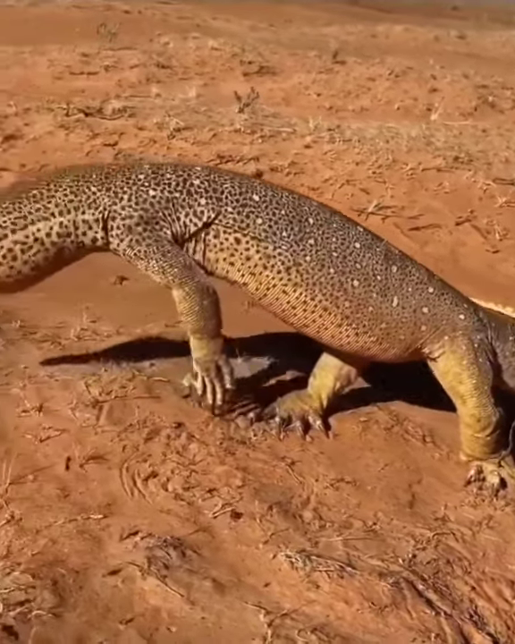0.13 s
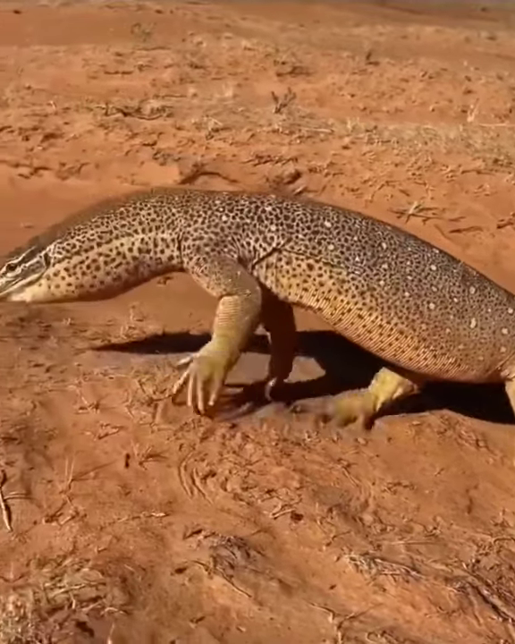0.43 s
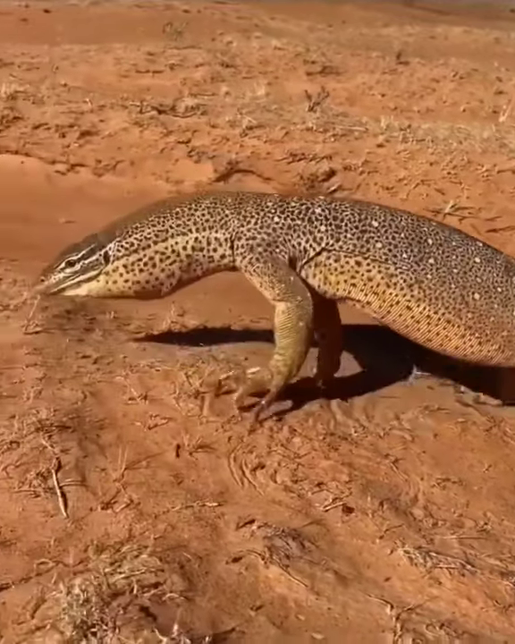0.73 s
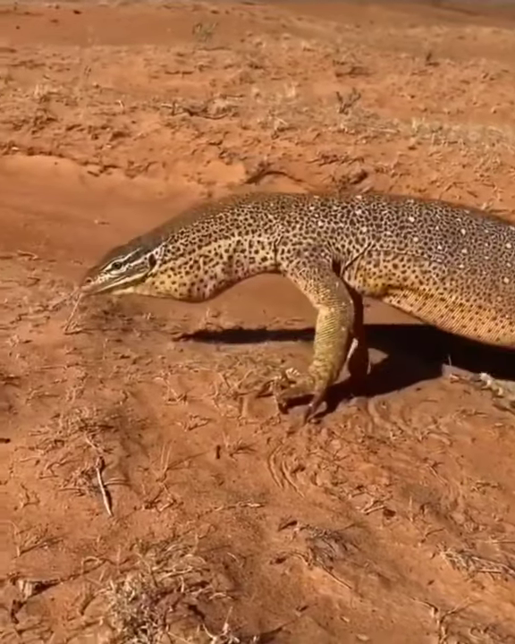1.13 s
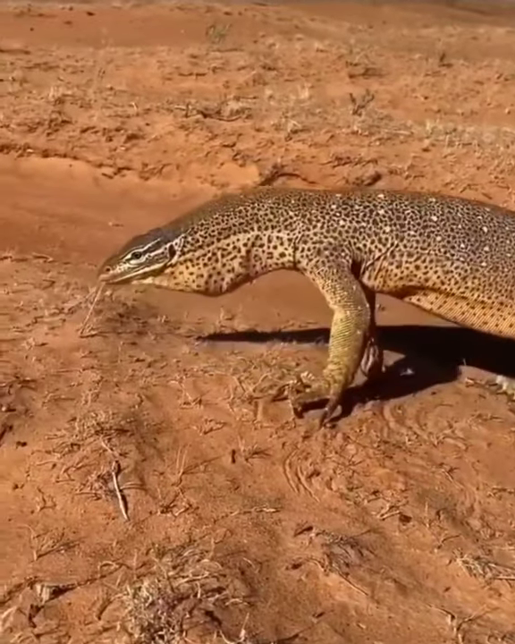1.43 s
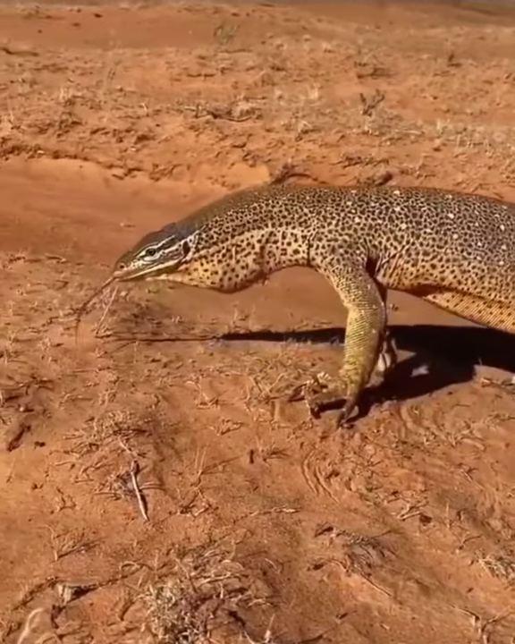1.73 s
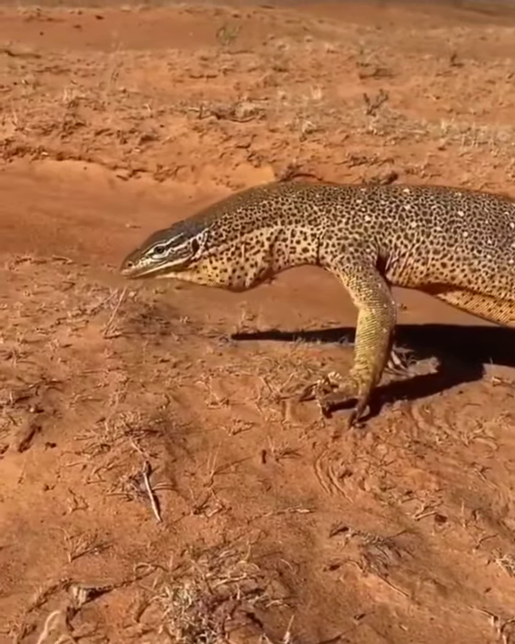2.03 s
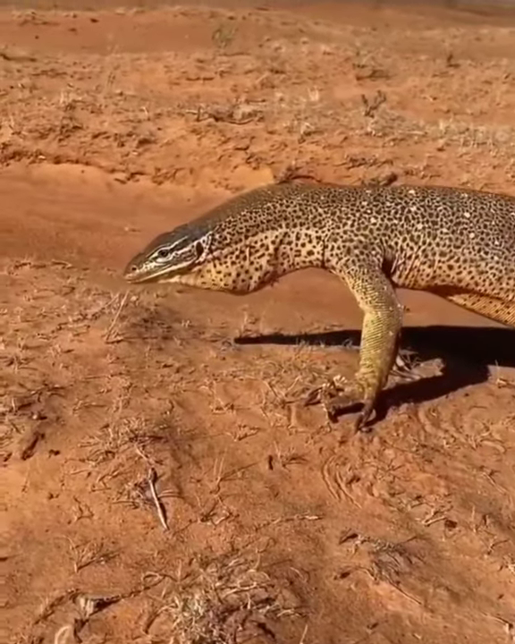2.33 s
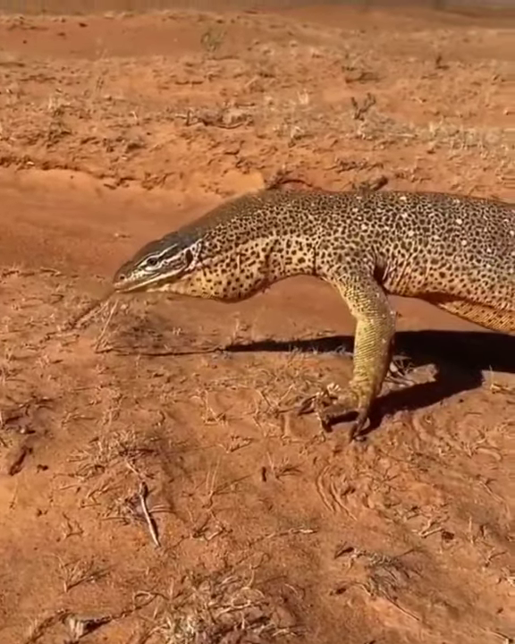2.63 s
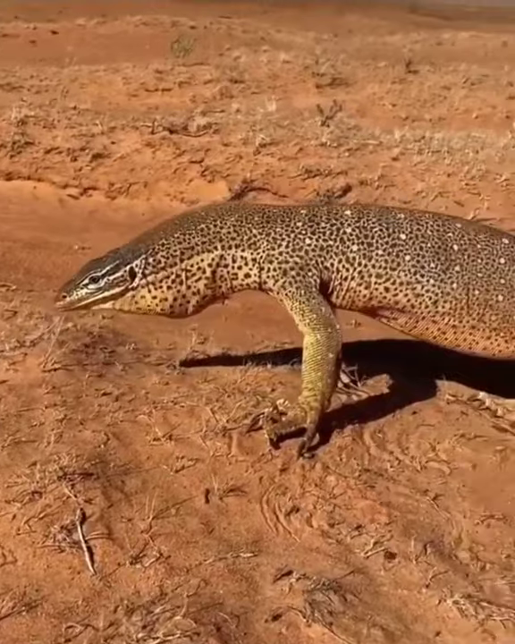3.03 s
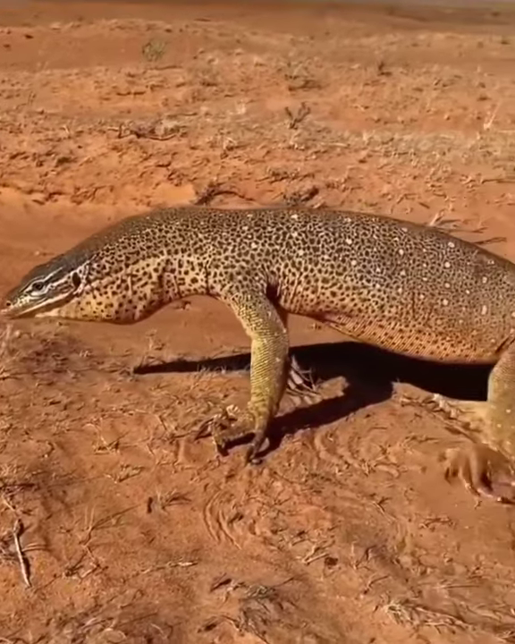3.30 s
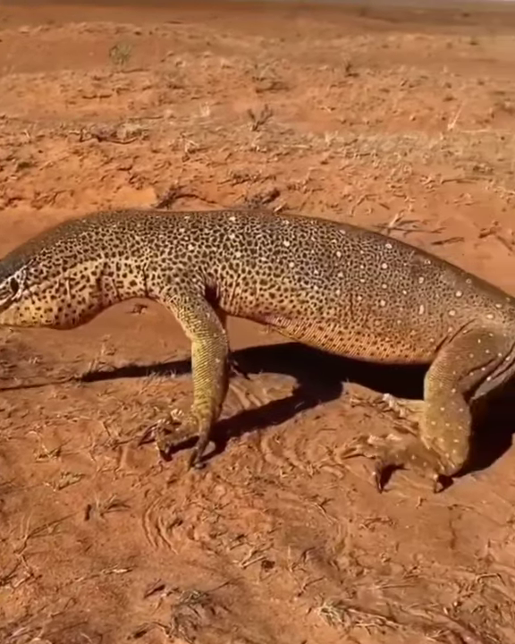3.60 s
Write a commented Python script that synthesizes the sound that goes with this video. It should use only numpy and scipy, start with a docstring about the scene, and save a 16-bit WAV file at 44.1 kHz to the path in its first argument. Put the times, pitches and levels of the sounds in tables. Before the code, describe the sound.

A hissing, hollow wind gust opens loudly, sinks in pitch and dies within a second, leaving low rumble and irregular flapping buffets on the microphone, with faint sand scuffs from a large lizard on open dry ground.

```python
"""A gust rushes past with a hiss and a hollow howl that sinks as it dies away; low rumble and flapping buffets remain.
Under them a faint sandy rustle as a large lizard walks by on dry open ground.
The howl is narrow noise that follows a pitch; roar, hiss, rumble and air are coloured noise under level curves.
Buffets are bursts of low noise, slaps short pressure waves, scuffs hiss with dense grains, ticks decaying noise."""
import sys
import numpy as np
from scipy import signal
from scipy.fft import rfft, irfft
from scipy.io import wavfile
from scipy.ndimage import uniform_filter1d

SR = 44100
rng = np.random.default_rng(int(sys.argv[2]) if len(sys.argv) > 2 else 0)


def store_wav(level_fs):
    """Save 16-bit WAV to argv[1]."""
    pcm = np.round(np.clip(np.atleast_2d(level_fs), -1, 1) * 32767)
    wavfile.write(sys.argv[1], SR, pcm.T.astype(np.int16))


N = 165816
TIME_S = np.arange(N) / SR
FREQ_HZ = np.maximum(np.fft.rfftfreq(N, 1 / SR), 1)

# Noise colours of the background. Each row: frequency in Hz, relative gain in dB.
AIR_COLOUR = [(200, 33), (700, 6.5), (2500, -4), (6000, -6), (13000, -80)]
SWISH_COLOUR = [(250, -45), (500, -2), (950, 2), (2800, -11.5), (4500, -22.5)]
SIZZLE_COLOUR = [(4000, -23.5), (7400, -5.5), (10000, -19)]
RUMBLE_COLOUR = [(28, -27), (48, -1.5), (72, 4), (140, -9.5), (220, -19.5), (500, -48), (900, -72),
                 (2500, -98)]
# Noise colours of sand and snapping grit. Each row: frequency in Hz, relative gain in dB.
RUSTLE_COLOUR = [(600, -6.5), (2100, 1.5), (3700, 0.5), (5000, -5), (6200, -5), (7500, -15), (11000, -11.5)]
TICK_COLOUR = [(1500, -15), (3500, 1), (6500, -5), (12000, -1.5)]
# Noise colours of the buffets and the gust. Each row: frequency in Hz, relative gain in dB.
THUD_COLOUR = [(50, -3), (110, 1), (200, 2), (310, -6), (420, -14), (700, -62.5)]
FLAP_COLOUR = [(200, 7), (420, 3), (590, 4.5), (760, -20), (1000, -37), (2500, -65)]
ROAR_COLOUR = [(150, -20), (250, -3.5), (330, 2.5), (450, 3), (650, -1.5), (950, -7.5), (1200, -15),
               (1550, -15), (1900, -33), (4500, -53)]
HISS_COLOUR = [(1200, -21.5), (1900, 2.5), (2500, 0), (2950, -1.5), (3250, -4.5), (3560, 1), (3900, -4.5),
               (4250, 3), (4700, -2), (5300, -2), (6400, -2.5), (7400, -1), (8400, -6), (9500, 0.5),
               (10800, -5), (11600, -7.5), (12600, -9.5)]
# Stereo width of ground sounds, microphone ports and gust. Each row: frequency in Hz, side gain in dB.
GROUND_WIDTH = [(800, 5.5), (1900, -7), (3900, -4), (7500, 7.5)]
PORT_WIDTH = [(30, -8), (70, -34.5), (130, -22), (400, -4), (900, 10)]
GUST_WIDTH = [(600, -8), (1800, -28), (2600, 2), (3500, -19.5), (5200, 0), (8000, 2)]

# Soft swish of air. Each row: time in seconds, level in dB.
SWISH_LEVEL = [(0.65, -56), (0.9, -67), (1.08, -55.5), (1.24, -62), (1.31, -72.5), (1.345, -86),
               (1.38, -78), (1.44, -62), (1.59, -88.5)]
# Faint high sizzle. Each row: time in seconds, level in dB.
SIZZLE_LEVEL = [(1.55, -100), (1.8, -85), (2.25, -74), (2.42, -100)]
# Wind pressure on the microphone. Each row: time in seconds, relative level in dB.
PRESSURE = [(0, -45), (0.06, -45), (0.1, -37), (0.22, -50), (0.28, -39), (0.45, -48.5), (0.73, -49.5),
            (0.8, -47.5), (1.3, -46), (1.8, -46.5), (1.97, -52.5), (2.15, -46), (2.19, -62), (2.3, -48),
            (2.41, -55.5), (2.46, -38), (2.5, -54.5), (2.57, -32), (2.64, -49.5), (2.69, -40), (3.24, -55),
            (3.4, -45), (3.48, -56.5), (3.65, -46)]
# Scuffs of dry sand and grass. Each row: start in seconds, hold in seconds, relative level in dB.
SCUFFS = [(0.74, 0.45, -60.5), (1.234, 0.061, -66.5), (1.358, 0.068, -67.5), (1.432, 0.1, -64.5),
          (1.658, 0.11, -68.5), (1.777, 0.63, -75.5), (2.246, 0.087, -65.5), (2.322, 0.074, -70.5),
          (2.406, 0.32, -76.5), (2.661, 0.1, -70), (2.785, 0.063, -64.5), (2.865, 0.062, -66.5),
          (2.906, 0.039, -61.5), (3.026, 0.14, -65), (3.209, 0.14, -63.5), (3.367, 0.043, -60.5),
          (3.42, 0.092, -67), (3.497, 0.035, -62.5), (3.67, 0.069, -80)]
# Snaps of grit underfoot. Each row: start in seconds, initial level in dB.
TICKS = [(2.591, -64.5), (2.692, -62), (2.969, -61), (3.001, -60), (3.018, -69), (3.068, -57)]
# Eddies that hit the microphone. Each row: start in seconds, relative level in dB, hold in seconds.
BUFFETS = [(0.092, -32.5, 0.009), (0.248, -22.5, 0.0074), (0.325, -26.5, 0.018), (0.649, -30.5, 0.021),
           (0.762, -34.5, 0.025), (0.813, -27, 0.013), (0.868, -27.5, 0.013), (0.998, -30, 0.0098),
           (1.023, -26, 0.025), (1.143, -28, 0.0049), (1.181, -34.5, 0.0065), (1.309, -27.5, 0.027),
           (1.343, -28.5, 0.013), (1.403, -32.5, 0.0082), (1.434, -24, 0.0052), (1.5, -47, 0.009),
           (1.585, -37, 0.053), (1.651, -33, 0.017), (1.69, -34, 0.037), (1.757, -35, 0.038),
           (1.795, -32, 0.0056), (1.881, -30.5, 0.011), (2.145, -36, 0.0098), (2.22, -35, 0.0095),
           (2.283, -27.5, 0.0029), (2.335, -35.5, 0.04), (2.539, -25, 0.014), (2.591, -37, 0.043),
           (2.678, -23, 0.006), (2.741, -24, 0.012), (2.877, -33, 0.014), (3.083, -28.5, 0.0083),
           (3.146, -39.5, 0.051), (3.332, -34.5, 0.008), (3.405, -36, 0.0046), (3.575, -33, 0.0091),
           (3.629, -36, 0.031)]
# Slaps of the sharpest eddies. Each row: centre in seconds, level in dB, pitch in Hz.
SLAPS = [(1.032, -38.5, 450), (1.159, -45, 308), (1.321, -35.5, 368), (1.343, -41.5, 567),
         (1.446, -39.5, 390), (2.298, -37.5, 315), (2.551, -34.5, 292), (2.683, -29.5, 382),
         (2.749, -39.5, 370), (3.728, -48, 432)]
# Howl of the gust. Each row: time in seconds, pitch in Hz, relative level in dB.
HOWL = [(0.0, 521.3, -40.5), (0.08, 512, -41), (0.125, 449.2, -50.5), (0.25, 341.5, -41.5), (0.4, 388, -41),
        (0.545, 360.7, -39), (0.6, 324.2, -44), (0.68, 282, -49)]
# Force of the gust. Each row: time in seconds, relative roar level in dB, relative hiss level in dB.
GUST_FORCE = [(0.0, -41.5, -37.5), (0.034, -39.5, -33), (0.218, -46.5, -46), (0.616, -51.5, -48.5),
              (0.684, -64.5, -57.5), (0.852, -54.5, -59.5), (0.9, -60, -86)]
# Thin whistles in the gust. Each row: pitch in Hz, wander rate in Hz, level against the hiss in dB.
WHISTLES = [(2941, 7, -18), (3558, 7, -18)]
# Close reflection of the hiss. Each row: time in seconds, delay in milliseconds.
REFLECTION = [(0, 0.29), (.17, 0.32), (.33, 0.27), (.47, 0.24), (.7, 0.23)]
# Narrow hollow rising through the hiss. Each row: time in seconds, centre in Hz.
HOLLOW = [(0, 5200), (0.2, 5280), (0.33, 5500), (0.45, 6100)]

AIR_DB = -66.5
RUMBLE_DB, RUMBLE_LUMPS_DB, RUMBLE_EVENING = 3.5, 2.3, 0.56
SCUFF_ATTACK_S, SCUFF_RELEASE_DB_PER_S = 0.029, 263
RUSTLE_DB, GRIT_DB, GRAINS_PER_S, GRAIN_SPREAD_DB = -4, -3.5, 980, 3
TICK_DECAY_S = 0.0033
BUFFET_ATTACK_S, BUFFET_RELEASE_DB_PER_S = 0.00455, 510
FLAP_ATTACK_S, FLAP_HOLD_S, FLAP_RELEASE_DB_PER_S = 0.0026, 0.0081, 765
THUD_DB, FLAP_DB = -10.5, 2.5
FLAP_DB_PER_BUFFET_DB = 2.124  # harder eddies are brighter
SLAP_CYCLES = 0.95  # from the centre to 1/e
HOWL_DB, HOWL_WANDER_HZ, HOWL_RELEASE_DB_PER_S = -0.5, 24, 241
OCTAVE_DB, OCTAVE_WANDER_HZ = -11, 41
WHISTLE_EVENING = 0.75
GUST_RELEASE_DB_PER_S, ROAR_DB, HISS_DB = 66, 3, 0.5
REFLECTION_SHARE, HOLLOW_WIDTH_HZ = 0.5, 450
GUST_PAN_DB, BUFFET_PAN_DB = -2.5, -1  # left minus right
LEFT_LEAD = 0.31  # share of the side signal that comes from the left port hearing first
CUTOFF_HZ = 13200


def from_db(db):
    """Decibels to gain."""
    return 10 ** (np.asarray(db) / 20)


def rms_one(x):
    """Scale to unit power."""
    return x / np.sqrt(np.mean(x ** 2) + 1e-20)


def in_time(rows):
    """Interpolate each column of a curve at every sample."""
    times_s, *columns = np.transpose(rows)
    return [np.interp(TIME_S, times_s, column) for column in columns]


def seconds_after(rows):
    """Seconds since a curve ended."""
    return np.maximum(TIME_S - rows[-1][0], 0)


def colour(x, points):
    """Filter by a gain curve in dB over log frequency."""
    hz, db = np.transpose(points)
    gain_db = np.interp(np.log(FREQ_HZ), np.log(hz), db)
    return irfft(rfft(x) * from_db(gain_db), N)


def drift(rate_hz):
    """Slow random curve of unit power: two-pole filtered noise on every 20th sample."""
    pole = np.exp(-2 * np.pi * rate_hz * 20 / SR)
    white = rng.standard_normal(N // 20 + 1002)
    slow = signal.lfilter([1], [1, -2 * pole, pole * pole], white)[1000:]  # settled part
    return np.interp(np.arange(N) / 20, np.arange(len(slow)), rms_one(slow))


def pan(db):
    """Left and right gains for a level difference, left minus right."""
    return from_db(np.array([[db], [-db]]) / 2)


def even(x, share, size):
    """Take a share of the chance swells out of a noise."""
    power = uniform_filter1d(np.abs(signal.hilbert(x)) ** 2, size)
    swell = (np.abs(power) + 1e-12) ** (np.clip(share, 0, 1) / 2)
    return rms_one(x / swell)


def spread(mid, side, width, lead=0):
    """Left and right: partly unrelated, partly one sound with its phase ahead on the left."""
    lead = np.clip(lead, 0, 1)
    quadrature = np.imag(signal.hilbert(mid))
    side = np.sqrt(1 - lead ** 2) * side - lead * quadrature
    return mid + colour(side, width) * np.array([[1], [-1]])


def noise(spectrum, width, evening=0, lead=0):
    """Coloured stereo noise, its mid at unit power."""
    whites = rng.standard_normal((2, N))
    mid, side = (even(colour(white, spectrum), evening, size=700) for white in whites)
    return spread(mid, side, width, lead)


def burst(start_s, db, attack_s, hold_s, release_db_per_s):
    """Gain over time: a rise centred on the start, a hold and a fade."""
    rise = np.clip((TIME_S - start_s) / attack_s + 0.5, 0, 1)
    fade_s = np.clip(TIME_S - start_s - hold_s, 0, 1)
    return rise * from_db(db - release_db_per_s * fade_s)


def flutter(x, patchy_db, rate_hz, count=14):
    """Overlapping bands that swell and sink, each on its own."""
    centres_hz = np.geomspace(900, 13000, count)
    spectrum = rfft(x)
    out = 0
    for band in np.eye(count):
        part = irfft(spectrum * np.interp(FREQ_HZ, centres_hz, band), N)
        out = out + part * from_db(patchy_db * drift(rate_hz))
    return out


def air():
    """A soft swish and a faint high sizzle over steady background noise."""
    swish_db, = in_time(SWISH_LEVEL)
    sizzle_db, = in_time(SIZZLE_LEVEL)
    swish = from_db(swish_db) * noise(SWISH_COLOUR, GUST_WIDTH)
    sizzle = from_db(sizzle_db) * noise(SIZZLE_COLOUR, GUST_WIDTH)
    return swish + sizzle + from_db(AIR_DB) * noise(AIR_COLOUR, GROUND_WIDTH)


def rumble():
    """Lumpy low pressure on the microphone: low noise under the pressure curve."""
    pressure_db, = in_time(PRESSURE)
    level_db = RUMBLE_DB + pressure_db + RUMBLE_LUMPS_DB * drift(30)
    return noise(RUMBLE_COLOUR, PORT_WIDTH, RUMBLE_EVENING) * from_db(level_db)


def ticks():
    """Single grains of grit snap: noise with an instant start and exponential decay."""
    level = np.zeros(N)
    for start_s, db in TICKS:
        decay = np.exp(-np.abs(TIME_S - start_s) / TICK_DECAY_S)
        level += from_db(db) * (TIME_S >= start_s) * decay
    return level * noise(TICK_COLOUR, GROUND_WIDTH, lead=LEFT_LEAD)


def grit():
    """Dense sand grains: random impulses of either sign and uneven size, coloured."""
    size_db = GRAIN_SPREAD_DB * np.minimum(rng.exponential(1, (2, N)), 2)
    sizes = from_db(size_db) * rng.choice([-1, 1], (2, N))
    struck = rng.random(N) < GRAINS_PER_S / SR
    mid, side = colour(sizes * struck, RUSTLE_COLOUR)
    return spread(rms_one(mid), rms_one(side), GROUND_WIDTH, LEFT_LEAD)


def rustle():
    """Sliding sand: each scuff is a fine hiss with dense grains in it."""
    scuffs = [burst(start_s, db, SCUFF_ATTACK_S, hold_s, SCUFF_RELEASE_DB_PER_S)
              for start_s, hold_s, db in SCUFFS]
    level = np.max(scuffs, axis=0)
    hiss = noise(RUSTLE_COLOUR, GROUND_WIDTH, lead=LEFT_LEAD)
    sand = flutter(hiss + from_db(GRIT_DB) * grit(), patchy_db=3.5, rate_hz=8.4)
    return sand * level * from_db(RUSTLE_DB + 1.5 * drift(68))


def buffets():
    """Each eddy is a short thud with a briefer flap higher up at its front."""
    thud, flap = np.zeros((2, N))
    for start_s, db, hold_s in BUFFETS:
        one_thud = burst(start_s, db, BUFFET_ATTACK_S, hold_s, BUFFET_RELEASE_DB_PER_S)
        flap_db = FLAP_DB_PER_BUFFET_DB * db
        one_flap = burst(start_s, flap_db, FLAP_ATTACK_S, FLAP_HOLD_S, FLAP_RELEASE_DB_PER_S)
        thud = np.maximum(thud, one_thud)
        flap = np.maximum(flap, one_flap)
    thuds = from_db(THUD_DB) * thud * noise(THUD_COLOUR, PORT_WIDTH, evening=0.79)
    flaps = from_db(FLAP_DB) * flap * noise(FLAP_COLOUR, PORT_WIDTH, evening=0.51)
    return (thuds + flaps) * from_db(2.54 * drift(63)) * pan(BUFFET_PAN_DB)


def slaps():
    """The sharpest eddies kick the microphone with a cycle or two of pressure."""
    out = np.zeros(N)
    phases = rng.random(len(SLAPS))  # in turns
    for (centre_s, db, hz), phase in zip(SLAPS, phases):
        cycles = (TIME_S - centre_s) * hz
        envelope = np.exp(-(cycles / SLAP_CYCLES) ** 2)
        out += from_db(db) * envelope * np.cos(2 * np.pi * (cycles + phase))
    return out * pan(BUFFET_PAN_DB)


def whistle(hz, wander_hz):
    """Shed vortices: a narrow band of noise that follows a pitch."""
    wander = drift(wander_hz) + 1j * drift(wander_hz)
    carrier = np.exp(2j * np.pi * np.cumsum(hz) / SR)
    return even(np.real(wander * carrier), WHISTLE_EVENING, size=400)


def reflected(x):
    """Add a slightly later copy; its drifting delay moves the hollows in the spectrum."""
    delay_ms, = in_time(REFLECTION)
    heard_s = TIME_S - delay_ms / 1000
    copy = np.array([np.interp(heard_s, TIME_S, channel) for channel in x])
    return rms_one(x + np.clip(REFLECTION_SHARE, 0, 1) * copy)


def hollowed(x):
    """Cut a narrow moving band out of the centre of the stereo image."""
    hz, = in_time(HOLLOW)
    carrier = np.exp(2j * np.pi * np.cumsum(hz) / SR)
    low = signal.butter(2, HOLLOW_WIDTH_HZ / 2, fs=SR, output="sos")
    # shift the band to 0 Hz, low-pass, shift back
    band = signal.sosfiltfilt(low, x.mean(axis=0) / carrier) * carrier
    return x - 2 * np.real(band)


def howl():
    """A hollow whistle and its octave on a sinking pitch."""
    hz, level_db = in_time(HOWL)
    octave = from_db(OCTAVE_DB) * whistle(2 * hz, OCTAVE_WANDER_HZ)
    fade_db = -HOWL_RELEASE_DB_PER_S * seconds_after(HOWL)
    return (whistle(hz, HOWL_WANDER_HZ) + octave) * from_db(HOWL_DB + level_db + fade_db)


def gust():
    """A howl in a broad roar, with a fluttering hiss and thin whistles above."""
    roar_db, hiss_db = in_time(GUST_FORCE)
    fade_db = -GUST_RELEASE_DB_PER_S * seconds_after(GUST_FORCE)
    roar = noise(ROAR_COLOUR, GUST_WIDTH) * from_db(ROAR_DB + roar_db + fade_db + 0.7 * drift(23))
    hiss = flutter(noise(HISS_COLOUR, GUST_WIDTH, lead=LEFT_LEAD), patchy_db=3.0, rate_hz=17.8)
    hiss = hollowed(reflected(hiss))
    for hz, wander_hz, db in WHISTLES:
        hiss = hiss + from_db(db) * whistle(np.full(N, hz), wander_hz)
    hiss = hiss * from_db(HISS_DB + hiss_db + fade_db + 0.27 * drift(28))
    return (howl() + roar) * pan(GUST_PAN_DB) + hiss


def scene():
    """All sources in the open, without echoes from afar."""
    return air() + rumble() + ticks() + rustle() + buffets() + slaps() + gust()


def record(dry):
    """Cut the top steeply with an elliptic low-pass."""
    low_pass = signal.ellip(12, 0.1, 80, CUTOFF_HZ, fs=SR, output="sos")  # 0.1 dB ripple, 80 dB stop
    return signal.sosfilt(low_pass, dry)


dry = scene()
out = record(dry)
store_wav(out)
```